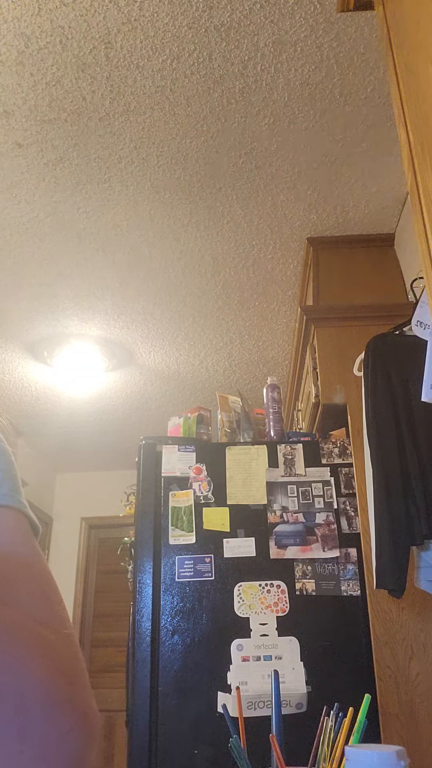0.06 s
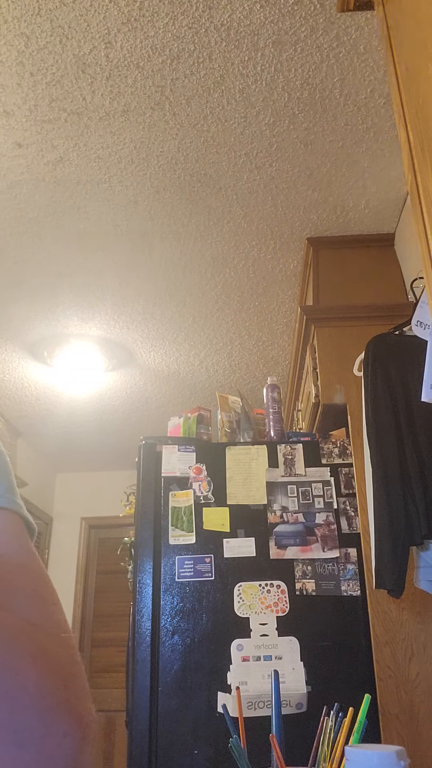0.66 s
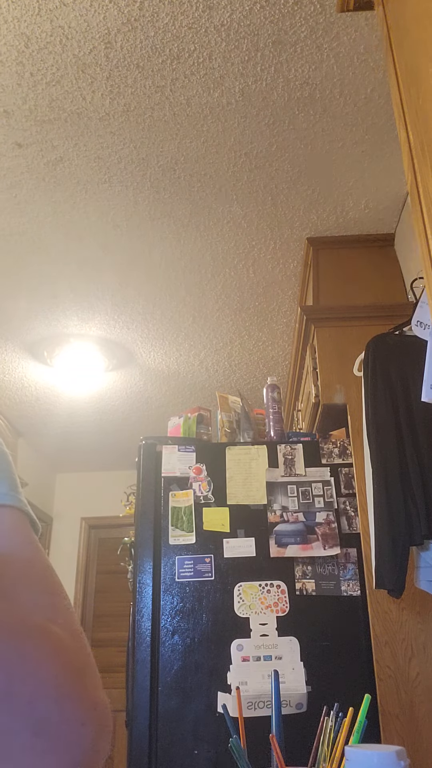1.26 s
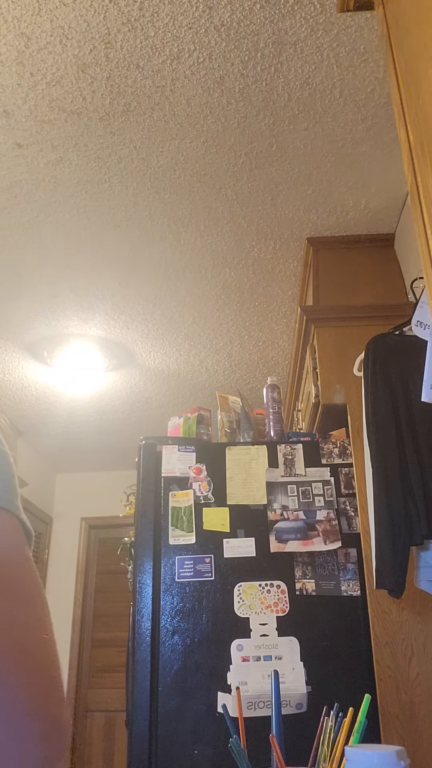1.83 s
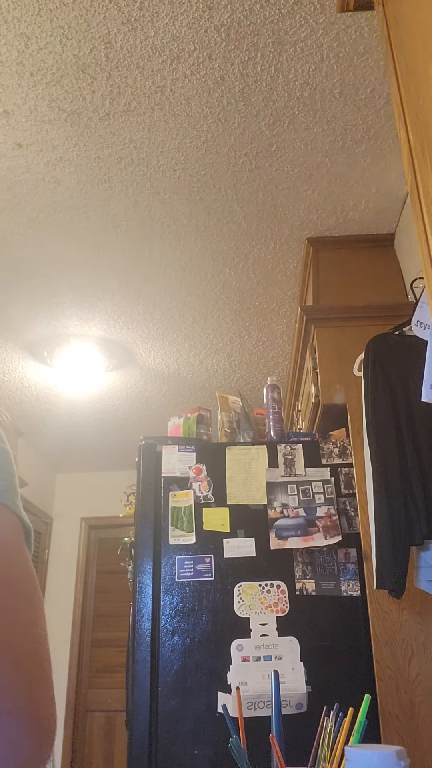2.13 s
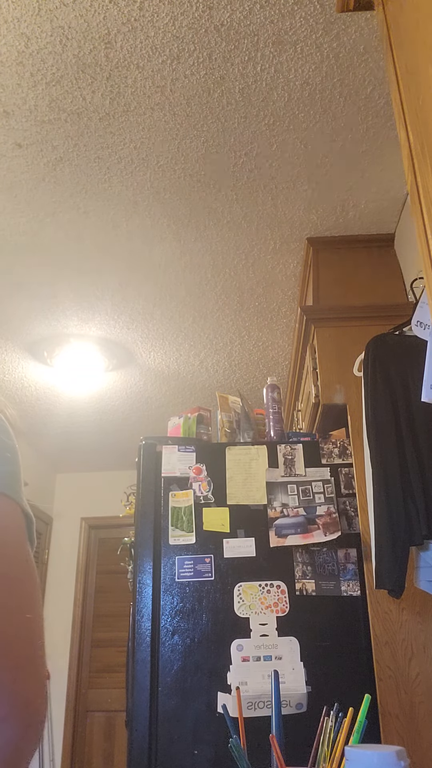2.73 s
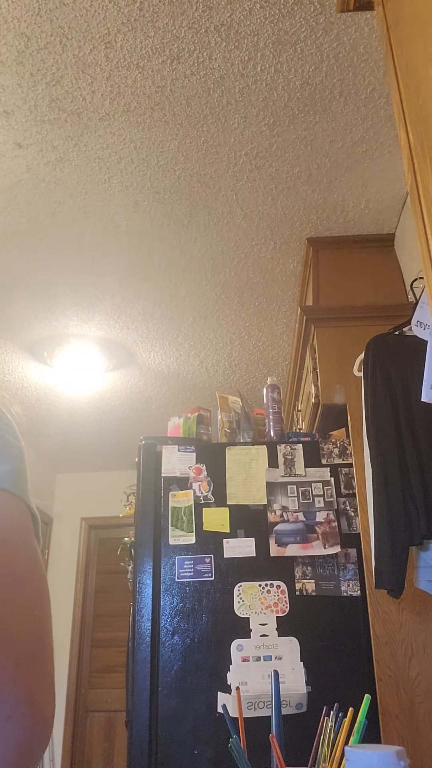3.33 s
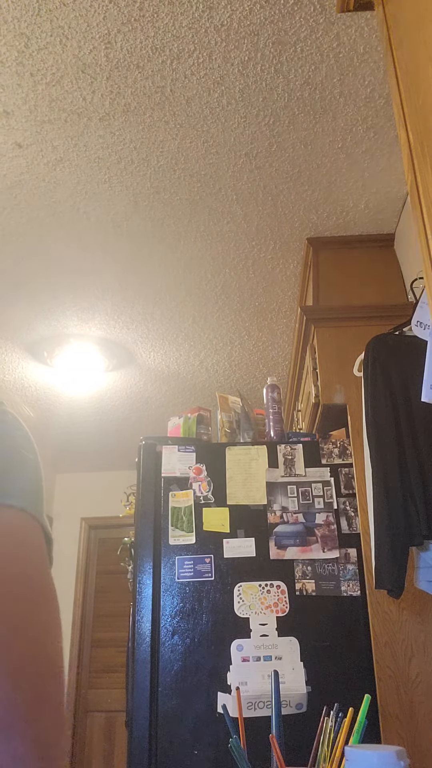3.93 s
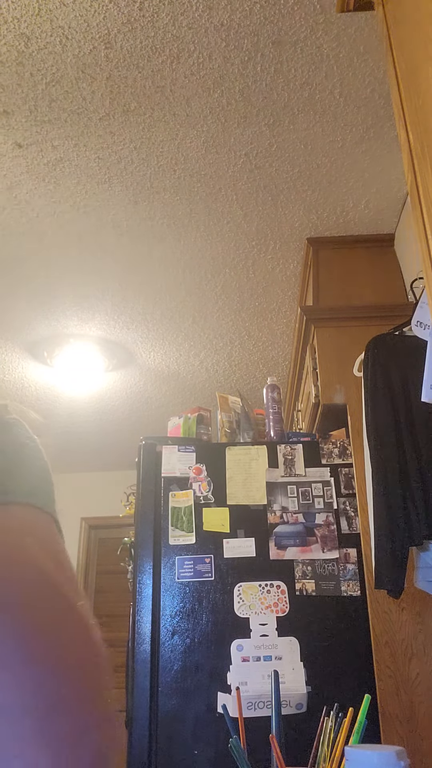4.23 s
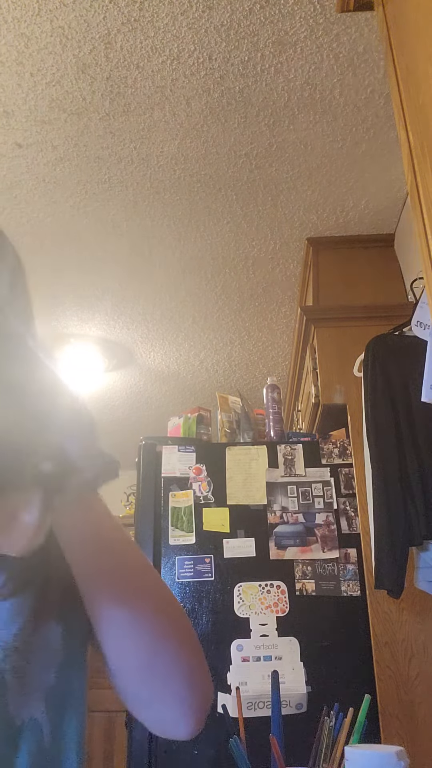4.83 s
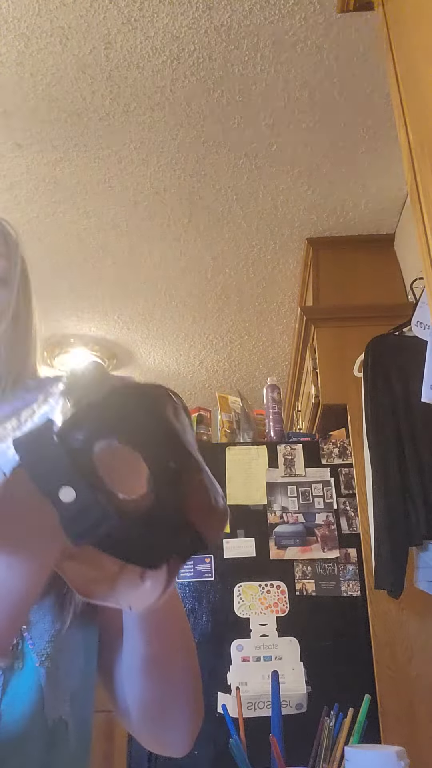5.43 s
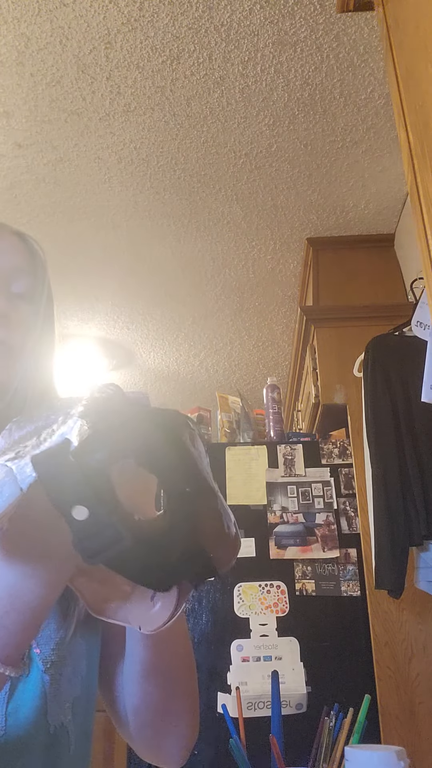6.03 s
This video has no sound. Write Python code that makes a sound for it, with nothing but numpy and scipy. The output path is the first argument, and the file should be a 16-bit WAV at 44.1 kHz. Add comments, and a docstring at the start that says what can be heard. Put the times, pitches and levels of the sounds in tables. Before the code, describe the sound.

Soft brush strokes and small taps in a quiet, humming kitchen, ending with a hollow rub and one rattling bump of a mask.

```python
"""Painting a hollow mask

In a quiet kitchen a paintbrush dabs back and forth, its bristles fizzing over a hollow mask, with
small taps, scuffs and one soft drag from the work. A slow fan hums and swishes once a turn.
Near the end the mask is lifted: it slides with a hollow rub, bumps once so that its shell rings
and briefly rattles, and slides on."""
import sys
import numpy as np
from scipy import signal
from scipy.fft import rfft, irfft
from scipy.io import wavfile
from scipy.ndimage import uniform_filter1d

SR = 44100
rng = np.random.default_rng(int(sys.argv[2]) if len(sys.argv) > 2 else 0)


def wrap_up_sound(samples):
    """Save the sound to the file named by the first command line argument, as 16-bit audio."""
    columns = np.atleast_2d(samples).T
    # keep every value between -1 and 1, then stretch to whole-number steps
    tamed = np.clip(columns, -1, 1)
    steps = np.round(tamed * 32767).astype(np.int16)
    wavfile.write(sys.argv[1], SR, steps)


N = 272890
TIME, HZ = np.arange(N) / SR, np.fft.rfftfreq(N, 1 / SR)

# Stereo image: f/Hz, left-right coherence/0..1
COHERENCE = [(100, 0.54), (300, 1), (640, 0.64), (1400, 0), (16000, 0.0012)]
# Reverb time of the kitchen: f/Hz, t60/s
KITCHEN_DECAY = [(100, 0.4), (400, 0.14), (1000, 0.3), (4000, 0.24), (9000, 0.21), (16000, 0.16)]
# Room tone spectrum: f/Hz, level/dB
AIR_COLOUR = [(20, -18.5), (40, -4.5), (60, -12.5), (90, -1.5), (170, 2.5), (260, -1.5), (400, -1.5),
              (550, -15), (800, -17), (1200, -26.5), (2500, -39.5), (5000, -45.5), (11000, -39),
              (16000, -46.5)]
# Pan of room tone, swish and drag: f/Hz, left minus right/dB
AIR_PAN = [(100, 9.5), (300, -1.5), (700, -4.5), (2000, -1.5), (6000, 2.5), (12000, -2)]
# Weaker motor tones: f/Hz, level/dB
MOTOR_DRONES = [(57.3, -69.5), (177.3, -63.5), (236.9, -66)]
# Spectrum of the fan's swish: f/Hz, level/dB
SWISH_COLOUR = [(300, 6.5), (600, -1), (900, 4.5), (1200, -5.5), (1600, 2), (2300, -11.5), (3000, -8),
                (3400, -17.5), (4200, -7), (5500, -16), (8000, -26), (16000, -41)]
# Short scuffs: t/s, length/s, level/dB, low-pass f/Hz
SCUFF_CUES = [(.005, 0.029, -53.5, 6350), (0.206, 0.099, -63.5, 4200), (0.328, 0.067, -69, 2190),
              (0.548, .025, -65.5, 2200), (0.988, 0.091, -70, 4520), (1.339, 0.038, -61, 3000),
              (1.552, 0.075, -73, 6000), (3.043, 0.036, -65, 5860), (4.232, 0.091, -76, 10100),
              (5.69, 0.089, -72, 6500), (6.066, .12, -91, 5500)]
# Taps, plus two sharp bristle snaps of the brush at 3.93 s and 4.34 s played the same way: t/s, level/dB, low-
# pass f/Hz, squeak f/Hz
TAP_CUES = [(0.057, -40, 7600, 4300), (.161, -48.5, 2500, 1840), (.259, -54, 3900, 2380),
            (.296, -57.5, 4460, 2240), (.574, -60.5, 2400, 2150), (1.003, -64.5, 2400, 2300),
            (1.332, -56, 5500, 3550), (1.373, -50.5, 4500, 2160), (1.607, -56.5, 2800, 1670),
            (1.707, -39, 7100, 3290), (1.954, -51.5, 13000, 8900), (1.98, -49.5, 6600, 1780),
            (1.992, -49, 7260, 4350), (3.927, -52.5, 7500, 5300), (4.342, -53, 9500, 5660),
            (6.14, -84, 6500, 4200)]
# Spectrum of taps and scuffs: f/Hz, level/dB
CONTACT_COLOUR = [(80, -21), (300, 3), (900, -6.5), (1600, 1), (2800, -4), (4500, 1), (8000, -1),
                  (16000, -0.5)]
# Resonances under taps and scuffs: f/Hz, width/Hz, boost/dB
CONTACT_RINGS = [(1560, 230, 3), (2610, 370, 6.5), (4000, 130, 2.5)]
# Pan of the mask's noises: f/Hz, left minus right/dB
MASK_PAN = [(200, -11.5), (700, -5.5), (2000, 0.5), (4500, 0.5), (8000, 4), (11000, -14), (15000, -8.5)]
# Brush strokes: middle t/s, level/dB, length/s
STROKE_CUES = [(0.774, -67.5, .044), (1.078, -64, 0.049), (1.417, -68, 0.057), (1.784, -60.5, 0.064),
               (2.104, -54, 0.051), (2.385, -59.5, 0.071), (2.647, -63.5, 0.085), (2.901, -63, 0.06),
               (3.148, -62, 0.049), (3.403, -58, 0.037), (3.647, -59, 0.07), (3.914, -54.5, 0.039),
               (4.154, -58, 0.074), (4.391, -58, 0.064), (4.604, -56, .048), (4.792, -59.5, 0.064),
               (5.714, -68.5, .059)]
# Bristle spectrum: f/Hz, level/dB
BRISTLE_COLOUR = [(600, -12), (1500, -21), (3400, -15), (4200, -5.5), (6500, -7), (7500, -5), (8500, -9),
                  (10000, -2.5), (11500, -4), (14000, -11), (16000, -9.5)]
# Pan of the brush: f/Hz, left minus right/dB
BRUSH_PAN = [(1000, -6), (4500, -1.5), (8000, 4.5), (10500, -9), (15000, -16.5)]
# Spectrum of the soft drag: f/Hz, level/dB
SOFT_RUB_COLOUR = [(300, -2), (550, 1), (850, 2), (1200, -4.5), (2000, -10.5), (3300, -20), (3900, -7),
                   (4700, -18), (5500, -15), (6400, -8.5), (8000, -20.5), (16000, -29)]
# Envelope of the slide's light surface fizz: t/s, level/dB
FIZZ_ENVELOPE = [(4.73, -79), (4.91, -65.5), (4.96, -57.5), (5.11, -53.5), (5.202, -35.5), (5.25, -52.5),
                 (5.39, -51.5), (5.45, -60), (5.5, -76)]
# Spectrum of that fizz: f/Hz, level/dB
SURFACE_COLOUR = [(300, -23), (900, 7.5), (1700, 3), (3000, 0.5), (5000, 3), (8000, -1), (11000, -1),
                  (14000, -9), (16000, -10.5)]
# Envelope of the slide's firm rub: t/s, level/dB
RUB_ENVELOPE = [(4.74, -90), (5.1, -67), (5.135, -42.5), (5.17, -44.5), (5.205, -31), (5.29, -35.5),
                (5.4, -43), (5.45, -65.5), (5.53, -65)]
# Spectrum of that rub: f/Hz, level/dB
FIRM_RUB_COLOUR = [(150, -13.5), (400, -15.5), (600, -8), (1000, -11), (1300, -15.5), (1650, -8),
                   (2900, -19), (5000, -15.5), (7000, -14), (8500, -21), (11000, -25), (16000, -42.5)]
# Resonances of the mask's hollow: f/Hz, width/Hz, boost/dB
HOLLOW_RINGS = [(743, 98, 20.5), (1047, 44, 10), (2200, 260, 10.5), (3150, 160, 8), (4084, 240, 16),
                (5160, 320, 12.5), (6550, 363, 8)]
# Two soft nudges, then the bump's two hits: t/s, level/dB, centre f/Hz, spread/octaves, crunch/dB
KNOCK_CUES = [(5.1096, -17, 414, .2, -56), (5.167, -31, 408, 0.21, -69), (5.2093, -19.5, 237, 0.64, -17.5),
              (5.2156, -15.5, 336, 0.83, -16.5)]
# Modes of the shell: f/Hz, level/dB, t60/s
SHELL_MODES = [(126, 0.5, 0.023), (151, 1, 0.068), (237.6, -9.5, 0.09), (288, -6.5, 0.14),
               (330, 1.5, 0.046), (401, -4.5, 0.16), (399, 2.5, 0.037), (477, -19, 0.034),
               (770, -10.5, 0.038), (863, -8, 0.047), (930, -10.5, .04)]
# Spectrum of a knock's crunch: f/Hz, level/dB
CRUNCH_COLOUR = [(100, -5.5), (400, 6), (620, -4.5), (950, 3), (1300, -12), (1600, -1), (2500, -15),
                 (5000, -12.5), (8000, -35.5), (16000, -43.5)]


def gain_of(db):
    """Decibels to gain."""
    return 10 ** (np.asarray(db) / 20)


def unit_rms(x):
    """Normalises to rms 1."""
    return x / np.sqrt(np.mean(x ** 2) + 1e-20)


def curve(points, hz=HZ):
    """Joins a table's points on a log-frequency axis."""
    f, value = np.transpose(points)
    return np.interp(np.log(hz + 1), np.log(f + 1), value)


def peaks(resonances):
    """A bell boost in dB for each resonance."""
    return sum(db / (1 + (2 * (HZ - hz) / width) ** 2) for hz, width, db in resonances)


def add(mix, start, sound):
    """Drops a stereo sound into the mix at start seconds."""
    part = mix[:, max(round(start * SR), 0):][:, :sound.shape[1]]
    part += sound[:, :part.shape[1]]


def stereo_spectra(pair):
    """Spectra of two unrelated channels, blended: narrow low mids, wide treble."""
    left, other = rfft(pair, N)
    shared = np.clip(curve(COHERENCE), -1, 1)
    return np.array([left, shared * left + np.sqrt(1 - shared ** 2) * other])


def coloured(noise, colour_db, pan):
    """Gives noise its EQ, pan and stereo width, at rms 1."""
    eq = gain_of(colour_db + np.outer([.5, -.5], curve(pan)))
    return unit_rms(irfft(stereo_spectra(noise) * eq, N))


def hiss():
    """Stereo white noise."""
    return rng.standard_normal((2, N))


def jerks(depth_db, samples):
    """A gain that wanders at random, in steps about this many samples long."""
    return gain_of(depth_db * unit_rms(uniform_filter1d(rng.standard_normal(N), samples)))


def friction(grain_db, samples):
    """Noise broken into tiny catches and slips."""
    return hiss() * jerks(grain_db, samples)


def held(start, end, attack_s=0.0024, release_s=0.033):
    """An envelope that rises at start, holds, and dies away after end."""
    rise = 1 - np.exp(-np.maximum(TIME - start, 0) / attack_s)
    return rise * np.exp(-np.maximum(TIME - end, 0) / release_s)


def burst(noise, start, t60, attack_s):
    """A slice of noise with a fast attack and an exponential tail."""
    piece = noise[:, max(round(start * SR), 0):][:, :SR // 4]
    t = TIME[:piece.shape[1]]
    return unit_rms(piece) * gain_of(-60 * t / t60) * (1 - np.exp(-t / attack_s))


def contact(scratch, top_hz, squeak_hz, squeak_width_hz=180, squeak_gain=1.1):
    """A harder contact is brighter; the spot it lands on adds one squeaky resonance."""
    dull = signal.lfilter(*signal.butter(2, top_hz, fs=SR), scratch)
    squeak = signal.lfilter(*signal.iirpeak(squeak_hz, squeak_hz / squeak_width_hz, fs=SR), dull)
    return unit_rms(dull + squeak_gain * squeak)


def kitchen(x, wet_db):
    """Room reverb: sparse reflections after a 4 ms predelay, each band dying at its own speed."""
    reflections = rng.standard_normal((2, SR)) * (rng.random((2, SR)) < .1) * (TIME[:SR] > .004)
    hz, t, bands = signal.stft(reflections, SR, nperseg=256)
    decay = gain_of(-60 * t / curve(KITCHEN_DECAY, hz)[:, None])
    tail = signal.istft(bands * decay, SR, nperseg=256)[1]
    tail = irfft(stereo_spectra(tail / np.linalg.norm(tail[0])), N)[:, :SR]
    return x + gain_of(wet_db) * signal.fftconvolve(x, tail, axes=1)[:, :N]


def room_tone(level_db=-55.5):
    """A bed of dull air with a thin, steady whine high above it."""
    whine = peaks([(9430, 620, 12.9)])
    return gain_of(level_db) * coloured(hiss(), curve(AIR_COLOUR) + whine, AIR_PAN)


def fan(turn_hz=2.19, swish_at_s=.71, hum_hz=120, throb_depth=0.21, throb_lead_s=0.053):
    """The motor hum throbs once a turn, just ahead of each swish of air."""
    throb = 1 + throb_depth * np.cos(2 * np.pi * turn_hz * (TIME - swish_at_s + throb_lead_s))
    hum = gain_of(-47.5) * throb * np.cos(2 * np.pi * hum_hz * TIME)
    drones = sum(gain_of(db) * np.cos(2 * np.pi * (hz * TIME + rng.random())) for hz, db in MOTOR_DRONES)
    motor = np.sqrt(2) * (hum + drones) * gain_of([[.45], [-.45]])  # a touch to the left
    nearness = np.cos(np.pi * turn_hz * (TIME - swish_at_s)) ** 2
    rush = coloured(hiss(), curve(SWISH_COLOUR) + peaks([(2810, 140, 11.2)]), AIR_PAN)
    return motor + rush * gain_of(-62.0) * (0.089 + nearness ** 2.54)


def scuffs():
    """A scuff bites quickly, moves over the surface in small jerks and lets go."""
    colour = curve(CONTACT_COLOUR) + peaks(CONTACT_RINGS)
    scratch = coloured(friction(grain_db=0.5, samples=70), colour, MASK_PAN)
    out = np.zeros((2, N))
    for start, length, db, top_hz in SCUFF_CUES:
        pressure = gain_of(db) * held(start, start + length, release_s=0.035)
        out += pressure * contact(scratch, top_hz, squeak_hz=1960)
    return kitchen(out * jerks(depth_db=2.6, samples=400), wet_db=-8.5)


def taps():
    """Each tap is a short burst of catches; the harder and brighter it is, the sooner it dies."""
    colour = curve(CONTACT_COLOUR) + peaks(CONTACT_RINGS)
    scratch = coloured(friction(grain_db=1.0, samples=70), colour, MASK_PAN)
    out = np.zeros((2, N))
    for start, db, top_hz, squeak_hz in TAP_CUES:
        softness = 7000 / top_hz
        tone = contact(scratch, top_hz, squeak_hz)
        add(out, start, gain_of(db) * burst(tone, start, t60=0.066 * softness ** 0.46, attack_s=0.0011))
    return kitchen(out, wet_db=-3.0)


def brush(flicks_per_s=260, flick_gain=0.69):
    """Bristles fizz over the surface, swelling and fading with the speed of each stroke."""
    speed = sum(gain_of(db) / np.cosh(1.92 * np.clip((TIME - middle) / length, -20, 20)) ** 1.22
                for middle, db, length in STROKE_CUES)
    catching = jerks(depth_db=1.9, samples=500)  # tufts snag and let go
    flicks = rng.uniform(0, 1.4, N) * (rng.random(N) < flicks_per_s / SR)  # single bristles spring free
    snaps = 1 + flick_gain * np.convolve(flicks, np.ones(20), "same")
    fizz = coloured(snaps * friction(grain_db=-1.0, samples=40), curve(BRISTLE_COLOUR), BRUSH_PAN)
    return kitchen(speed * catching * fizz, wet_db=-13)


def drag(start_s=1.965, end_s=2.66, start_db=-68.5, swell_db_per_s=12):
    """One long, soft rub over the mask that presses harder as it goes."""
    swell = gain_of(start_db + swell_db_per_s * (TIME - start_s))
    pressure = swell * held(start_s, end_s, attack_s=0.028, release_s=0.031)
    return pressure * coloured(friction(grain_db=1.5, samples=80), curve(SOFT_RUB_COLOUR), AIR_PAN)


def slide(settle_s=5.59):
    """The mask slides in the hand: a light touch only fizzes, firm rubbing makes the hollow resound."""
    firm, light = (gain_of(np.interp(TIME, *np.transpose(points))) * held(points[0][0], points[-1][0])
                   for points in (RUB_ENVELOPE, FIZZ_ENVELOPE))
    hollow = curve(FIRM_RUB_COLOUR) + peaks(HOLLOW_RINGS)
    rub = coloured(friction(grain_db=1.4, samples=90), hollow, MASK_PAN)
    fizz = coloured(friction(grain_db=0.5, samples=50), curve(SURFACE_COLOUR), MASK_PAN)
    sliding = jerks(depth_db=1.86, samples=600) * (firm * rub + light * fizz)
    # as the mask settles, one last light rub wakes only the higher resonances
    thin_rub = signal.lfilter(*signal.butter(2, 1200, "high", fs=SR), rub)
    touch = gain_of(-64) * held(settle_s, settle_s + 0.021) * thin_rub
    return kitchen(sliding + touch, wet_db=-7.0)


def bump():
    """Knocks ring the shell and crunch; where each lands decides which modes answer."""
    out, t = np.zeros((2, N)), TIME[:SR // 3]
    crunch = coloured(friction(grain_db=1.0, samples=50), curve(CRUNCH_COLOUR), MASK_PAN)
    for start, db, centre_hz, spread, crunch_db in KNOCK_CUES + rattle():
        ring = np.zeros_like(t)
        for hz, mode_db, t60 in SHELL_MODES:
            excitation = np.exp(-.5 * (np.log2(hz / centre_hz) / spread) ** 2)
            ring += excitation * gain_of(mode_db - 60 * t / t60) * np.sin(2 * np.pi * hz * t)
        onset = (1 - np.exp(-t * spread / 0.00038)) ** 2  # a soft knock wakes few modes, and slowly
        add(out, start, gain_of([[db - .5], [db + .5]]) * ring * onset)
        add(out, start, gain_of(crunch_db) * burst(crunch, start, t60=0.046, attack_s=0.0023))
    low_cut = signal.butter(2, 70, "high", fs=SR)  # a small shell gives no deep bass
    return kitchen(signal.lfilter(*low_cut, out + judder()), wet_db=-10.0)


def judder(mode_hz=411, width_hz=118, level_db=-34.5):
    """Stick and slip keep the shell's main mode sounding from the first nudge to the bump."""
    mode = signal.iirpeak(mode_hz, mode_hz / width_hz, fs=SR)
    ring = unit_rms(signal.lfilter(*mode, signal.lfilter(*mode, rng.standard_normal(N))))
    envelope = held(KNOCK_CUES[0][0], KNOCK_CUES[-1][0], attack_s=0.016, release_s=0.01)
    return gain_of(level_db) * ring * envelope


def rattle(rebounds=3, gap_s=.0081, centre_hz=144.4, spread=0.68, loss_db=3, crunch_loss_db=10.5):
    """Knock cues for the dull, even rebounds after the bump, each weaker and less crunchy."""
    bump_s = KNOCK_CUES[-1][0]
    return [(bump_s + (k + 1) * gap_s, -13 - k * loss_db, centre_hz, spread, -17 - k * crunch_loss_db)
            for k in range(rebounds)]


def scene():
    """The stereo mix: room and fan under the work on the mask."""
    return room_tone() + fan() + scuffs() + taps() + brush() + drag() + slide() + bump()


def record(dry, cutoff_hz=15800):
    """A steep low-pass on the master trims the top treble."""
    low_pass = signal.firwin(511, cutoff_hz, window=("kaiser", 9), fs=SR)
    return signal.oaconvolve(dry, low_pass[None], "same")


dry = scene()
out = record(dry)
wrap_up_sound(out)
```